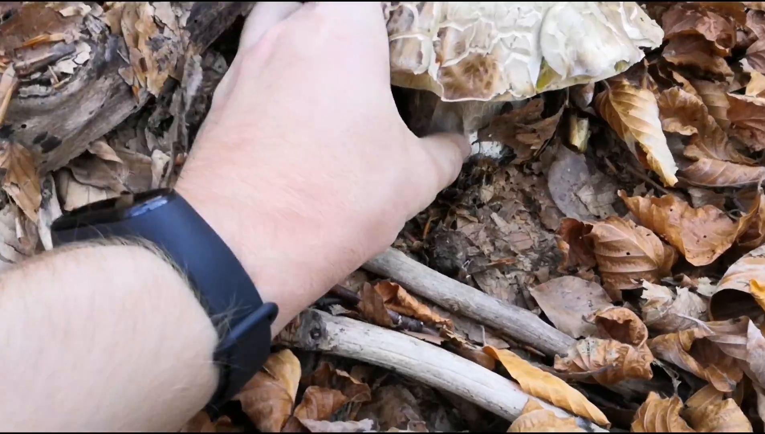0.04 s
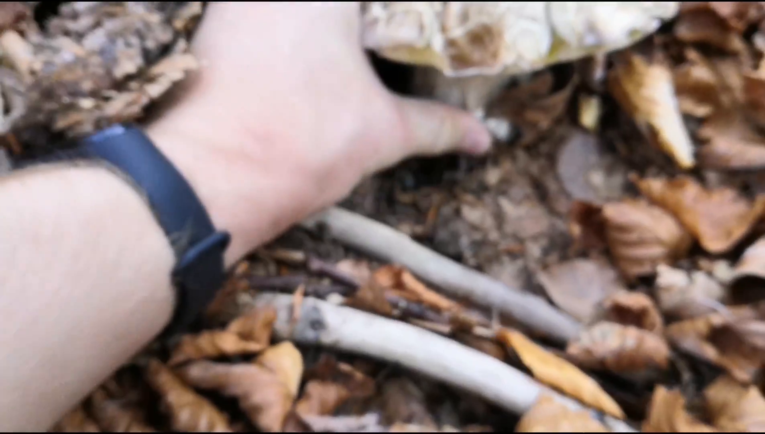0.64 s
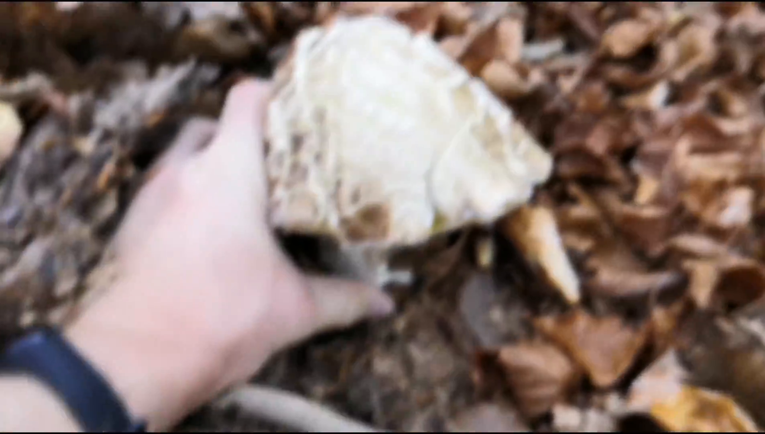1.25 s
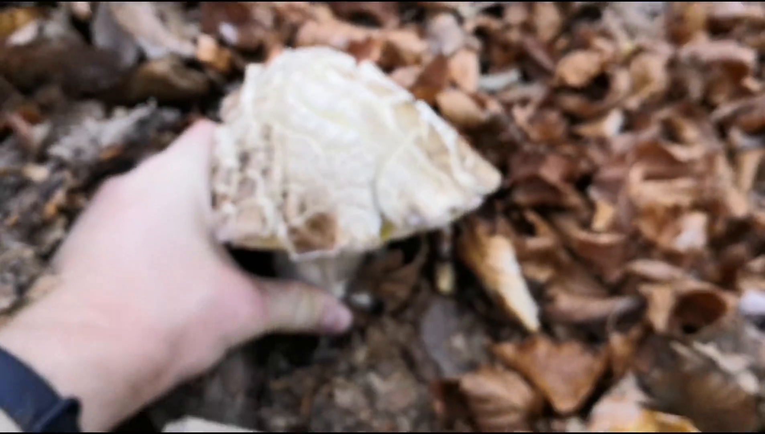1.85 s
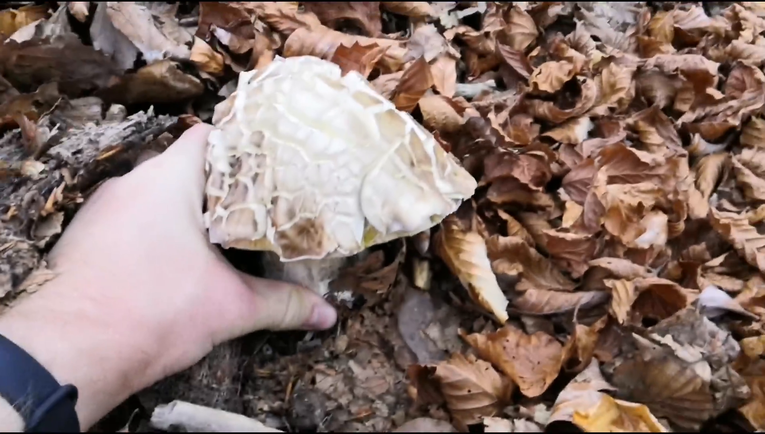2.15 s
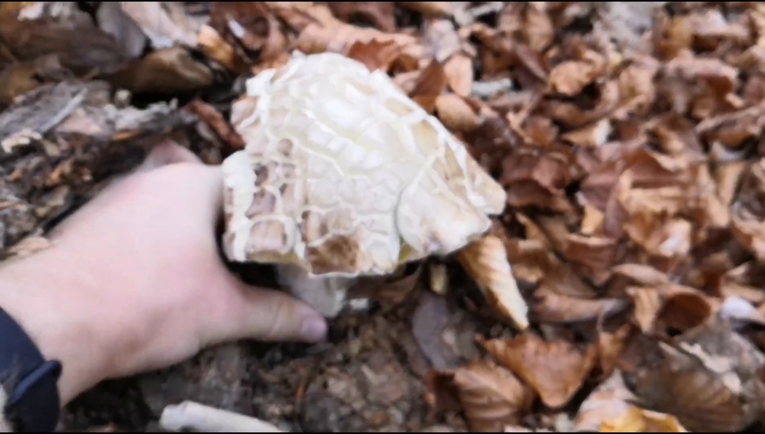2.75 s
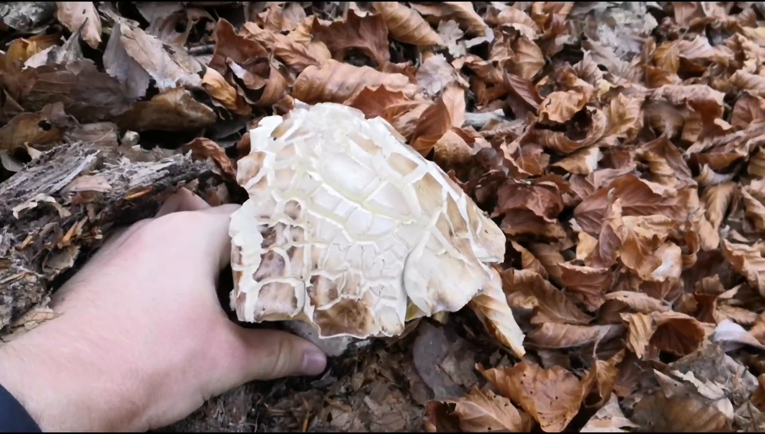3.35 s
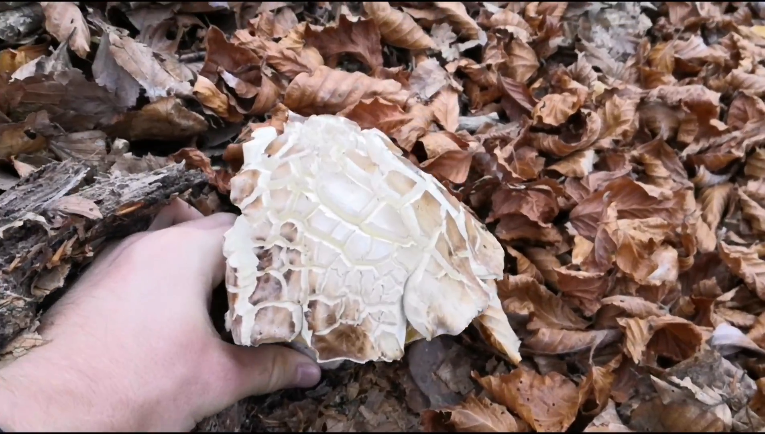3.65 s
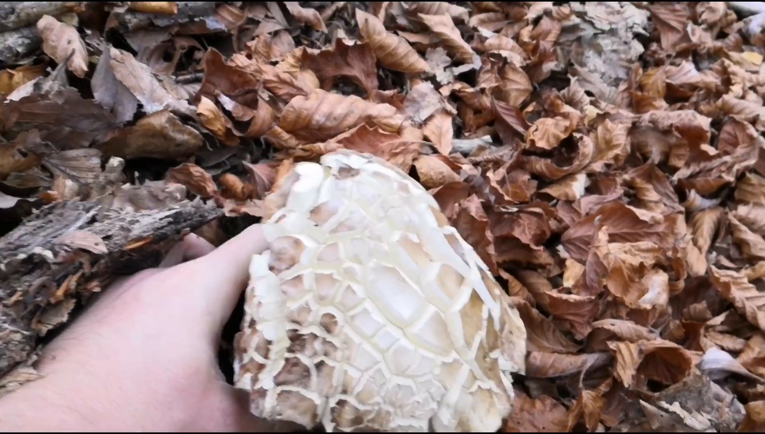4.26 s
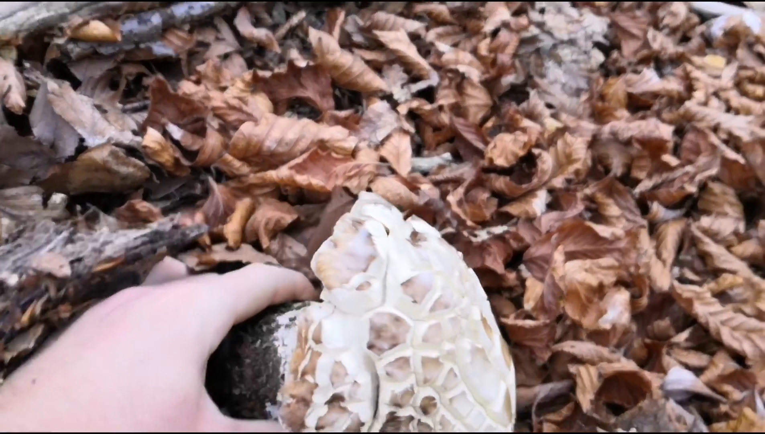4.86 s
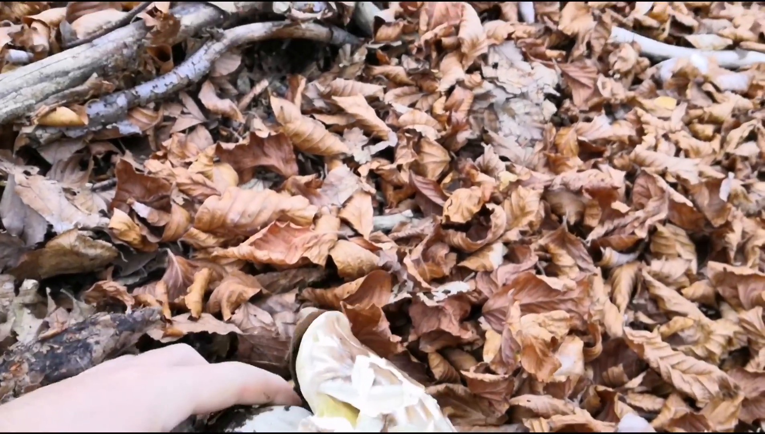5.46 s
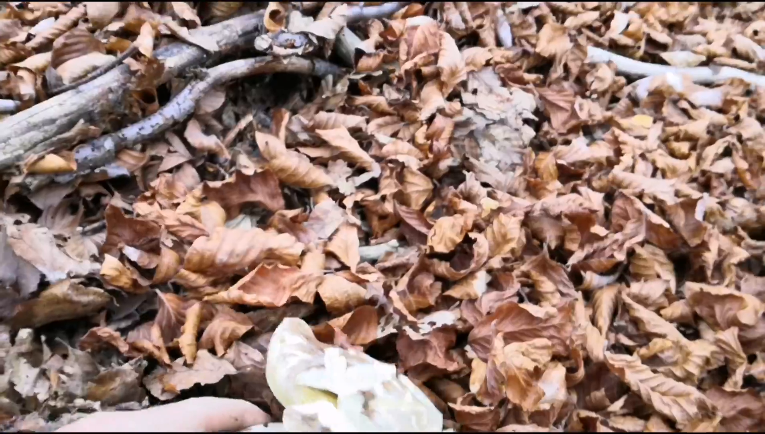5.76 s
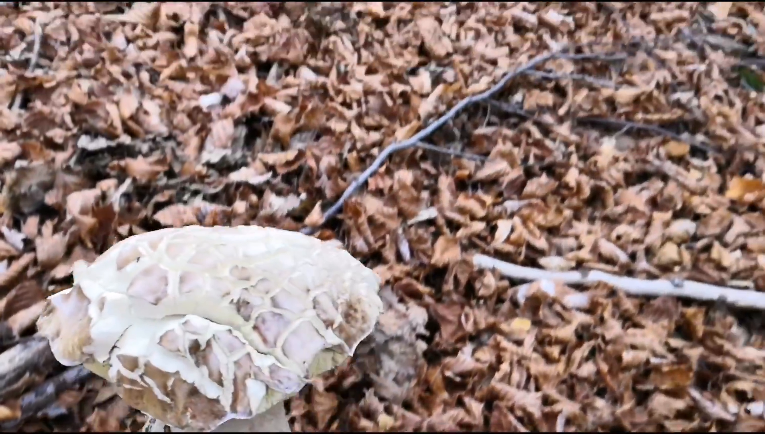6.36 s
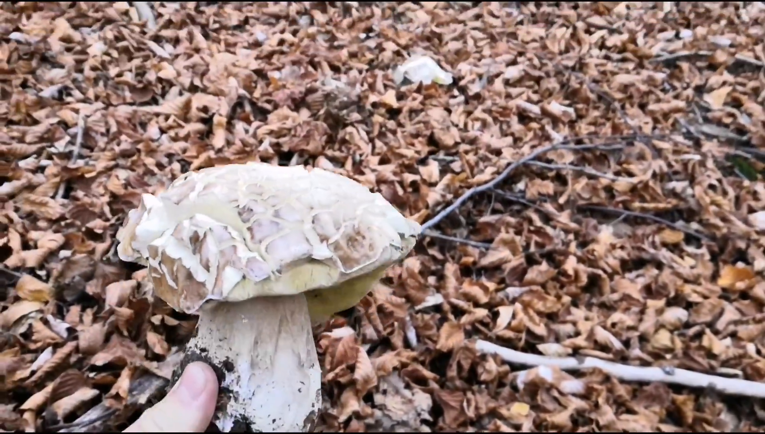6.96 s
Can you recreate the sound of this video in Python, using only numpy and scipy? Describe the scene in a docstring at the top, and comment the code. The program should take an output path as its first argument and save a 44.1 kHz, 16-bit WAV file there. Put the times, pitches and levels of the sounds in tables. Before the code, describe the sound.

Close to the microphones on a still woodland floor, a hand works a large mushroom out of dry fallen leaves. The leaves rustle and crackle in uneven pushes, with soft soil scrunching underneath and single leaves and twigs snapping left and right. The stem gives with a few dull knocks, early on and again midway. The rustling then thins out, and one sharp woody click comes near the end.

```python
"""Picking a mushroom in beech litter

A still woodland floor, a pair of microphones close to a hand working a large mushroom out of dry leaves.
With each push the leaves rub and crackle in thousands of tiny fractures, and soil scrunches under the
fingers. Single leaves and twigs snap, and the stem knocks dully as it gives and is handled.
One sharp woody click comes near the end."""
import sys
import numpy as np
from scipy import signal
from scipy.fft import rfft, irfft, next_fast_len
from scipy.io import wavfile

SR = 44100
rng = np.random.default_rng(int(sys.argv[2]) if len(sys.argv) > 2 else 0)


def log_audio(samples):
    """Write samples as a 16-bit WAV file to the path given in sys.argv[1]."""
    # one column per channel
    frames = np.atleast_2d(samples).T
    # limit to full scale, then quantise
    limited = np.clip(frames, -1, 1)
    pcm = np.round(limited * 32767).astype(np.int16)
    wavfile.write(sys.argv[1], SR, pcm)


N = 313981

# Tone of the still air, the soil and the dry leaves. Each row: frequency in Hz, relative level in dB.
AIR_SPECTRUM = [(15, -8), (30, -2), (70, 0.5), (150, -11), (300, -22.5), (650, -18), (2300, -31),
                (7200, -51), (9500, -49), (16000, -23)]
SOIL_SPECTRUM = [(29, -54), (50, 2), (97, 1), (161, 4.5), (296, 1.5), (417, -6.5), (470, -22), (555, -9.5),
                 (700, -20.5), (910, -46), (1540, -120)]
LEAF_SPECTRUM = [(280, -29.5), (450, -17), (580, -22), (960, -9), (1300, -9.5), (1750, -3), (2450, -1.5),
                 (3300, -4), (4500, -4.5), (5500, -3), (7800, -10), (8600, -17), (11500, -26),
                 (15500, -29.5)]
# How the two microphones hear the leaves. Each row: frequency in Hz, left minus right in dB.
LEAF_BALANCE = [(400, -1.5), (650, 12.5), (1100, -4), (2200, 1), (4000, -5), (6000, -3), (8500, 7),
                (13000, 3)]
# The hand's light touch between pushes. Each row: time in seconds, rustle level in dB.
LIGHT_TOUCH = [(0, -63), (1, -75), (1.35, -55), (1.85, -58.5), (3.7, -63), (5.6, -61.5), (5.9, -66),
               (6.37, -64), (7.12, -70.5)]
# Pushes of the hand. Each row: crest time in seconds, rustle level in dB, swell and fade in seconds,
# treble and soil offsets in dB, left minus right in dB.
HAND_PUSHES = [(0.02, -38.5, 0.083, 0.15, -2.5, -18, 1), (0.315, -41.5, 0.17, 0.17, 2, -15.5, 3),
               (0.57, -45, .11, 0.15, 2, -15.5, 5.5), (0.832, -39.5, .17, 0.11, -1.5, -18, -0.5),
               (1.144, -39.5, 0.084, 0.14, 0, -15.5, 3.5), (1.49, -45.5, 0.072, 0.14, -0.5, -17, 0),
               (1.62, -45.5, 0.16, 0.12, -2, -28, 0), (1.77, -50, .05, .06, -0.5, -23, 2),
               (2.03, -43, .16, 0.12, -1, -16.5, 0.5), (2.23, -36.5, 0.061, 0.14, 0, -16.5, -3),
               (2.35, -42.5, 0.084, 0.11, 3.5, -20, 8), (2.588, -42, 0.084, 0.087, -1.5, -17, 0.5),
               (2.885, -44, 0.097, 0.081, -0.5, -21, 0), (3.15, -49.5, 0.15, 0.081, 2, -16, 1),
               (3.31, -51, 0.07, 0.067, 1, -19, 2.5), (3.51, -46.5, 0.081, 0.053, -0.5, -19.5, 6),
               (3.584, -48, .025, 0.015, 3, -20, 6.5), (3.765, -48.5, .1, 0.056, 0.5, -16, 3.5),
               (3.941, -49.5, 0.073, 0.074, 2.5, -20, 1.5), (4.041, -36, 0.045, 0.077, 0.5, -16, 4),
               (4.29, -41, 0.18, 0.2, -0.5, -19.5, 1.5), (4.645, -42, 0.19, 0.099, 0, -11.5, 0.5),
               (4.831, -37.5, 0.17, 0.078, 1, -18, -3), (4.95, -45.5, 0.052, 0.033, -1.5, -21, -2),
               (5.049, -45.5, 0.05, 0.1, -1, -22, -2.5), (5.25, -48, 0.14, 0.071, -1, -18.5, 1),
               (5.395, -42.5, 0.049, 0.1, 1, -22, -2.5), (5.76, -48, 0.13, 0.067, -0.5, -22, 1.5),
               (6.11, -58, .08, 0.29, 4, -17, 9), (6.205, -59, 0.04, .12, 0, -13, -11),
               (6.427, -49, 0.015, 0.037, -1, -37, -2), (6.66, -61.5, 0.13, 0.08, -11, -19, -5)]
# Stem and soil giving way. Each row: start in seconds, peak in dB, pitch in Hz, 60 dB decay in seconds.
STEM_KNOCKS = [(0.81, -25.5, 1030, 0.0025), (.8098, -19.5, 270, 0.0097), (.821, -35.5, 149, 0.14),
               (3.9905, -32.5, 770, 0.007), (3.995, -38.5, 275, .045), (4.015, -30.5, 960, 0.0045),
               (4.039, -35, 810, 0.005), (4.043, -38.5, 167, 0.058), (6.851, -47.5, 436, 0.047),
               (6.854, -43, 167, .02)]
# What the knocks set ringing. Each row: frequency in Hz, sharpness as Q, relative level in dB.
HUM_MODES = [(134, 12, 6), (226, 5.3, -3)]
# The clicking wood. Each row: frequency in Hz, relative level in dB, 60 dB decay in seconds.
WOOD_MODES = [(603, -10, 0.0072), (1200, -5, 0.021), (1790, 12, 0.0092), (2430, 20, 0.0059),
              (2720, 16, 0.0093), (3900, -12, .008), (5570, -10, 0.015)]
# The loudest leaves and twigs breaking. Each row: start in seconds, level in dB, ring in Hz,
# left minus right in dB, tearing time in seconds.
LEAF_SNAPS = [(0.2991, -29.5, 2650, 21, 0.00057), (0.316, -29.5, 5570, 6, 0.00087),
              (0.4146, -19.5, 5700, -1, .0003), (0.4898, -36.5, 6800, 2, 0.00063),
              (0.662, -38, 7200, 1, .0009), (0.808, -25, 3120, -10, 0.00064),
              (0.89, -28.5, 3420, -13, 0.00045), (0.9337, -27.5, 2760, -4, 0.001),
              (1.0152, -32, 5940, 14, 0.00037), (1.1826, -22, 2440, 12, 0.00027),
              (1.8395, -33.5, 2540, 13, 0.00038), (1.889, -26.5, 2540, 0, 0.00047),
              (2.209, -26.5, 4850, -14, 0.00083), (2.2231, -25.5, 5270, -11, 0.00042),
              (2.343, -29.5, 3970, -9, 0.0043), (2.6727, -32.5, 4730, -8, 0.0013),
              (2.833, -25.5, 2530, 9, 0.00053), (2.871, -31.5, 3170, -15, 0.00091),
              (2.8987, -27.5, 7400, -2, 0.00042), (3.117, -31, 4630, -5, 0.00031),
              (3.1613, -30, 7400, 20, .0007), (3.1708, -32.5, 2310, 2, 0.0013),
              (3.203, -33, 6800, 2, 0.0012), (3.232, -33.5, 5040, 2, 0.0011), (3.429, -35, 7300, 8, 0.0015),
              (3.4679, -29, 5400, -9, 0.00031), (3.4858, -31, 1930, -14, .0007),
              (3.5402, -31.5, 6750, 6, 0.0012), (3.566, -30, 7300, 17, .0006),
              (3.6729, -30.5, 7100, 4, 0.00066), (3.722, -28.5, 7500, 6, 0.00033),
              (3.7659, -21, 6170, 7.5, 0.0009), (4.0136, -27, 1920, 11, 0.0012),
              (4.0379, -15, 2380, 4, 0.00022), (4.0815, -22, 2380, 12, .0005),
              (4.6797, -28.5, 3930, 11, 0.00065), (4.861, -25.5, 5800, -2, 0.00065),
              (4.8673, -25, 4140, -5, 0.0016), (4.9329, -32.5, 5140, -4, 0.0006),
              (5.0763, -33.5, 3830, -10, 0.0016), (5.26, -30.5, 6040, 4, 0.00068),
              (5.4812, -34, 5000, -9, 0.0013), (5.863, -35, 2560, -1.5, 0.00068),
              (5.991, -51.5, 1970, 3, 0.00056), (6.044, -47.5, 2090, -4, 0.00092),
              (6.1674, -41, 7200, 7, 0.00048), (6.1864, -40, 2030, 0, 0.0012),
              (6.414, -39.5, 5400, -3, .001), (6.7714, -49.5, 4140, -3, 0.00058),
              (6.953, -49.5, 3750, -9, 0.0007)]


def amp(db):
    """Decibels to gain."""
    return 10 ** (np.asarray(db) / 20)


def unit_rms(x):
    """Scales to rms 1."""
    return x / np.sqrt(np.mean(x ** 2) + 1e-20)


def colour(x, spectrum):
    """Filters by rows of Hz and dB, joined on a log-frequency axis."""
    size = next_fast_len(N + 4096)
    hz, db = np.transpose(spectrum)
    gain_db = np.interp(np.log(np.fft.rfftfreq(size, 1 / SR) + 1), np.log(hz + 1), db)
    return irfft(rfft(x, size) * amp(gain_db), size)[..., :N]


def band(x, low_hz, high_hz, order=2):
    """Causal band-pass."""
    return signal.sosfilt(signal.butter(order, [low_hz, high_hz], "band", fs=SR, output="sos"), x)


def ring(x, hz, q):
    """One damped resonance."""
    return signal.lfilter(*signal.iirpeak(hz, q, SR), x)


def panned(db):
    """Gains at the two microphones for a level difference, left minus right."""
    gains = np.array([[amp(db / 2)], [amp(-db / 2)]])
    return unit_rms(gains)


def add(mix, start_s, sound):
    """Mixes a stereo sound in at its start time."""
    part = mix[:, round(start_s * SR):][:, :sound.shape[1]]
    part += sound[:, :part.shape[1]]


def wander(step_s, samples):
    """Glides to a new random value every step; about rms 1."""
    steps = rng.standard_normal(4000)
    return np.interp(samples / SR / step_s, np.arange(len(steps)), steps) * np.sqrt(3 / 2)


def still_air(level_db=-72.5, split_hz=350):
    """The wood all around: a faint rumble common to both microphones and a thin hiss in each."""
    noise = rng.standard_normal((3, N))
    rumble = signal.sosfilt(signal.butter(2, split_hz, fs=SR, output="sos"), noise[0])
    hiss = signal.sosfilt(signal.butter(2, split_hz, "high", fs=SR, output="sos"), noise[1:])
    return amp(level_db) * unit_rms(colour(rumble + hiss, AIR_SPECTRUM))


def woodland_reflections(x, wet_db=-21, t60=0.086, size=13000):
    """Ground, log and trunks nearby add a short, faint tail to the direct sound."""
    t = np.arange(size) / SR
    tail = band(rng.standard_normal((2, size)), 610, 5600, order=1) * amp(-60 * t / t60) * (t > .003)
    return x + amp(wet_db) * signal.oaconvolve(x, tail / np.linalg.norm(tail[0]), axes=1)[:, :N]


def hand_pressure(drop_db=9, roundness=1.7, touch_soil_db=-13):
    """Pushes swell and fade over a light touch; gives the gains of rustle, its treble, and soil."""
    t = np.arange(N) / SR
    touch = amp(np.interp(t, *np.transpose(LIGHT_TOUCH)))
    leaf_power = np.array([touch, touch]) ** 2
    treble_power = leaf_power.copy()
    soil_power = (touch * amp(touch_soil_db)) ** 2
    for crest_s, db, swell_s, fade_s, treble_db, soil_db, pan_db in HAND_PUSHES:
        from_crest = np.maximum((crest_s - t) / swell_s, (t - crest_s) / fade_s)
        near = from_crest < 5
        push = amp(db - drop_db * from_crest[near] ** roundness)
        leaf_power[:, near] += (push * panned(pan_db)) ** 2
        treble_power[:, near] += (push * amp(treble_db) * panned(pan_db)) ** 2
        soil_power[near] += (push * amp(soil_db)) ** 2
    return np.sqrt(leaf_power), np.sqrt(treble_power), np.sqrt(soil_power)


def soil_scrunch(digging, crumbs_per_s=900, size_db=2.0, side_db=-4):
    """Crumbs shift under the fingers: low bumps, the deepest alike at both microphones."""
    crumbs = rng.standard_normal((2, N)) * amp(size_db * np.minimum(rng.exponential(1, (2, N)), 3))
    crumbs *= rng.random((2, N)) < crumbs_per_s / SR
    mid, side = unit_rms(band(colour(crumbs, SOIL_SPECTRUM), 74, 1300))
    side = amp(side_db) * band(side, 220, 3000, order=1)
    return np.array([mid + side, mid - side]) * digging


def stem_knocks(rise_s=0.00076, hum_db=-8, size=9000):
    """Stem and soil give way in damped pops, dead centre; the low ones leave a brief hum."""
    out, t = np.zeros((2, N)), np.arange(size) / SR
    for start_s, peak_db, hz, t60 in STEM_KNOCKS:
        pop = -amp(-60 * t / t60) * np.sin(2 * np.pi * hz * t) * (1 - np.exp(-t / rise_s))
        pop = band(pop, 110, 3400, order=3)
        pop += sum(amp(hum_db + mode_db) * ring(pop, mode_hz, q) for mode_hz, q, mode_db in HUM_MODES)
        add(out, start_s, amp(peak_db) * np.array([pop, pop]) / abs(pop).max())
    return out


def wood_click(start_s=6.8502, level_db=-14, left_lag_s=0.00015, pan_db=-2, rise_s=0.00074, size=2500):
    """A stiff piece of wood rings for a few milliseconds, a little to the right."""
    out = np.zeros((2, N))
    t = np.maximum(np.arange(size) / SR - np.array([[left_lag_s], [0]]), 0)
    click = sum(amp(db - 60 * t / t60) * np.cos(2 * np.pi * hz * t) for hz, db, t60 in WOOD_MODES)
    click *= 1 - np.exp(-t / rise_s)
    add(out, start_s, amp(level_db) * click / abs(click).max() * panned(pan_db))
    return out


def leaf_tick(hz, q=7, crack_s=0.00019, scatter_s=0.0042, scatter_db=-15, raw_gain=0.16, size=512):
    """A tiny crack rings one leaf's blade, and the leaves around scatter it."""
    t = np.arange(size) / SR
    crack = rng.standard_normal(size) * np.exp(-t / crack_s)
    lag_s = np.clip(rng.normal(-0.00013, 0.00014), -.0005, .0005)  # mostly the left microphone first
    pair = np.array([np.interp(t - max(delay, 0), t, crack, left=0) for delay in (lag_s, -lag_s)])
    pair += amp(scatter_db) * rng.standard_normal((2, size)) * np.exp(-t / scatter_s)
    return unit_rms(ring(pair, hz, q) + raw_gain * pair)


def settling_leaves(effort, base_db=-15, follow=0.42, size_db=4, pan_db=7, count=85):
    """Bent leaves spring back with tiny bright ticks, which stand out in the lulls."""
    out, effort_db = np.zeros((2, N)), 20 * np.log10(effort.mean(0))
    for when, pitch, size, side in rng.random((count, 4)):
        tick = band(leaf_tick(2000 + 6000 * pitch, q=5.3, scatter_db=-26, raw_gain=0.31), 1200, 9200)
        db = base_db + follow * effort_db[int(when * N)] + size_db * (2 * size - 1)
        add(out, when * N / SR, amp(db) * tick / abs(tick).max() * panned(pan_db * (2 * side - 1)))
    return out


def leaf_crackle(ticks_per_s=3400, size_db=3.5, pan_spread_db=3, leaf_count=56):
    """Many leaves tick at random, in clumps as they stick and slip; mostly small ticks, a few large."""
    clumps_db = 2.62 * wander(step_s=.009, samples=np.arange(N))
    out = np.zeros((2, N))
    for hz in np.geomspace(1000, 11000, leaf_count):
        chance, strength = rng.random((2, N))
        onsets = np.flatnonzero(chance < ticks_per_s / leaf_count / SR)
        swing = 2 * strength[onsets] - 1
        tick_db = size_db * np.minimum(-np.log(abs(swing) + 1e-9), 4)
        pressed_db = 3.5 * wander(step_s=.04, samples=onsets)  # each leaf takes its turn under the hand
        fractures = np.zeros(N)
        fractures[onsets] = np.sign(swing) * amp(tick_db + clumps_db[onsets] + pressed_db)
        ticks = signal.oaconvolve(fractures[None], leaf_tick(hz), axes=1)[:, :N]
        out += ticks * panned(rng.normal(0, pan_spread_db))
    # together the leaves cover all pitches evenly
    hz, power = signal.welch(out, SR, nperseg=512)
    flatten_db = -10 * np.log10(power.mean(0) + 1e-12)
    return unit_rms(colour(out, np.c_[hz, flatten_db][1:]))


def leaf_snaps(q=6.7, scatter_db=-11, scatter_s=.006, edge_db=-6, size=1500):
    """A vein tears in a quick run of fractures that rings its blade; the litter scatters the crack."""
    out, t = np.zeros((2, N)), np.arange(size) / SR
    for start_s, db, hz, pan_db, tear_s in LEAF_SNAPS:
        tearing = t / tear_s * np.exp(1 - t / tear_s)
        shared, per_mic, scatter = rng.choice([-1., 1.], (3, 2, size))
        fractures = unit_rms(tearing * (shared[0] + per_mic))
        fractures += amp(scatter_db) * unit_rms(scatter * np.exp(-t / scatter_s))
        blade = unit_rms(ring(fractures, hz, q))
        edge = amp(edge_db) * unit_rms(band(fractures, 1730, 9500))
        crack = unit_rms(band(blade + edge, 690, 7500, order=5))
        # splinters fizz more with higher-ringing blades and shorter tears
        fizz_db = -20.5 + 5.5 * np.log2(hz / 4050) - np.log2(tear_s / 0.00095)
        crack += amp(fizz_db) * unit_rms(band(fractures, 5900, 15000))
        crack *= np.linalg.norm(tearing) / np.linalg.norm(crack, axis=1, keepdims=True)
        add(out, start_s, amp(db) * crack * panned(pan_db))
    return out


def leaf_rustle(effort, crispness, treble_db=-1, rub_db=-6, rub_width=1.6, lead_s=.00013, split_hz=4000):
    """Close up, crackle and smooth rubbing follow the hand; crisp leaves add treble."""
    crackle = leaf_crackle()
    shared = rng.standard_normal(N)
    rub = np.array([shared, np.roll(shared, round(lead_s * SR))])  # the hand is nearer the left side
    rub += rub_width * rng.standard_normal((2, N))
    leaves = colour(crackle + amp(rub_db) * unit_rms(rub), LEAF_SPECTRUM)
    for mic, side in enumerate((1, -1)):
        leaves[mic] = colour(leaves[mic], [(hz, side * db / 2) for hz, db in LEAF_BALANCE])
    dull = signal.sosfiltfilt(signal.butter(3, split_hz, fs=SR, output="sos"), leaves)
    return unit_rms(dull) * effort + amp(treble_db) * unit_rms(leaves - dull) * crispness


def scene():
    """Leaves, soil and stem close to the microphones, the quiet wood behind."""
    effort, crispness, digging = hand_pressure()
    leaves = leaf_rustle(effort, crispness) + leaf_snaps() + settling_leaves(effort)
    return woodland_reflections(leaves) + soil_scrunch(digging) + stem_knocks() + wood_click() + still_air()


def record(dry):
    """The recorder cuts the treble steeply above 15.6 kHz."""
    low_pass = signal.firwin(255, 15600, window=("kaiser", 8), fs=SR)
    return signal.oaconvolve(dry, low_pass[None], "same")


dry = scene()
out = record(dry)
log_audio(out)
```